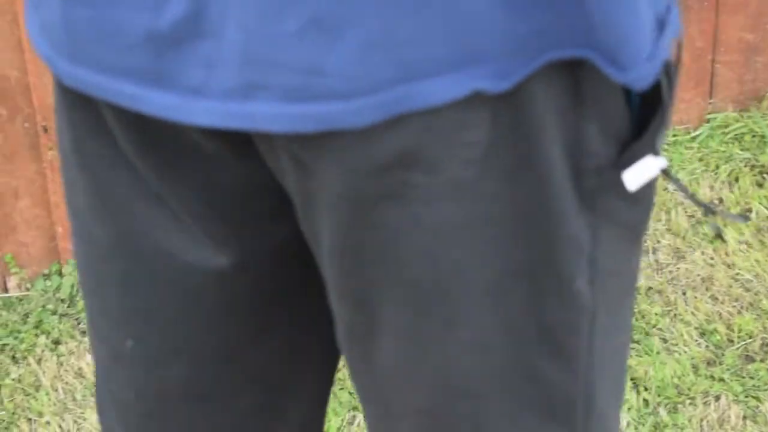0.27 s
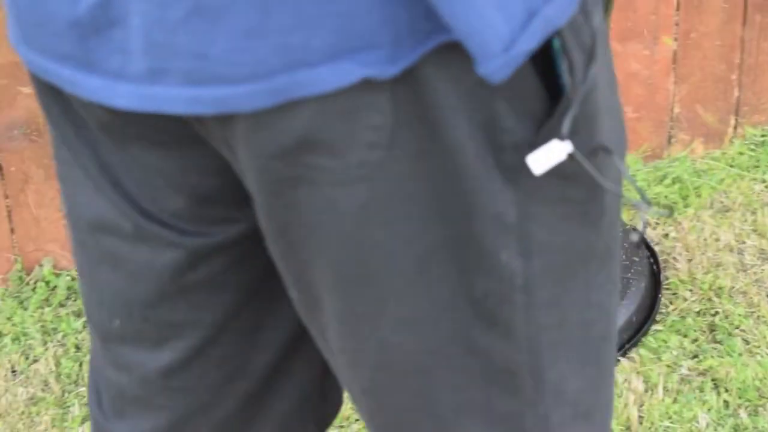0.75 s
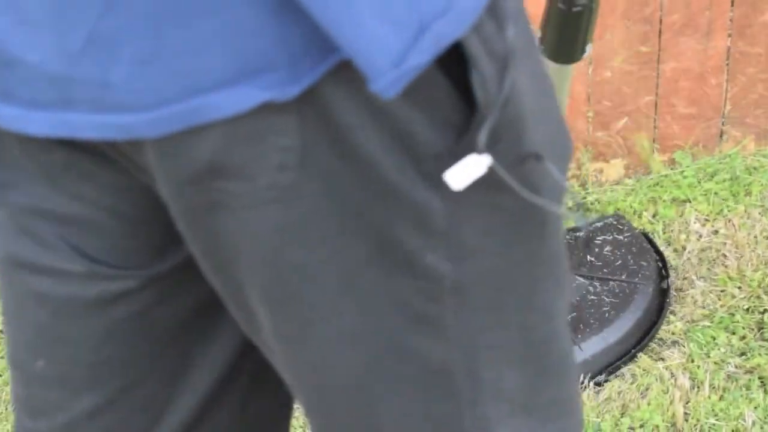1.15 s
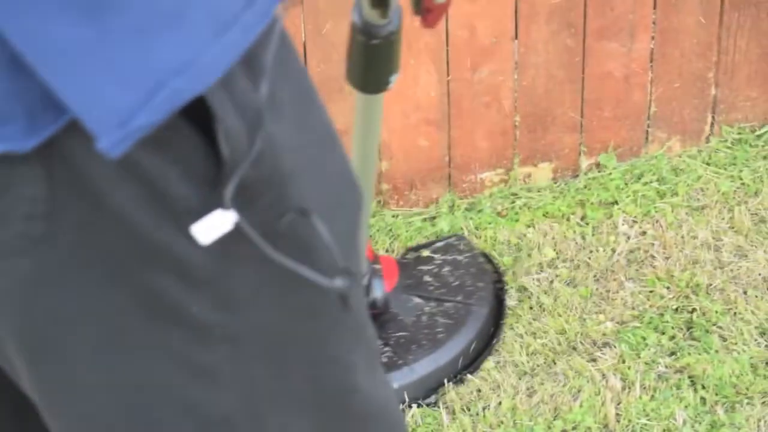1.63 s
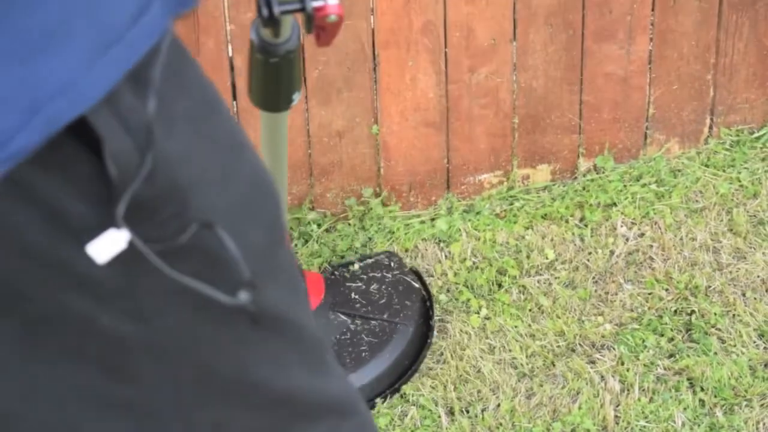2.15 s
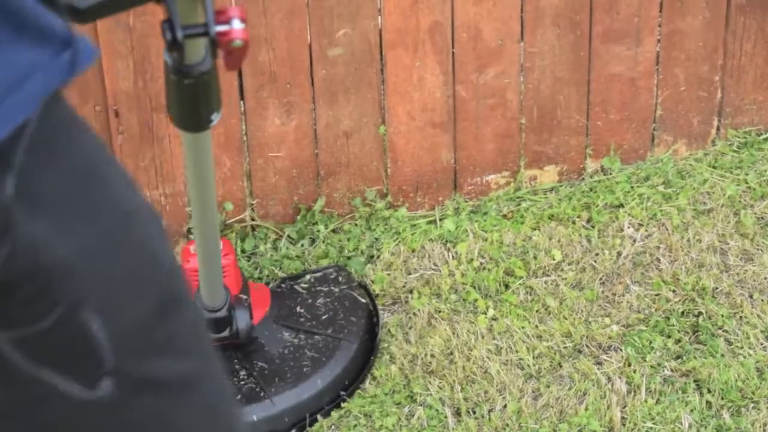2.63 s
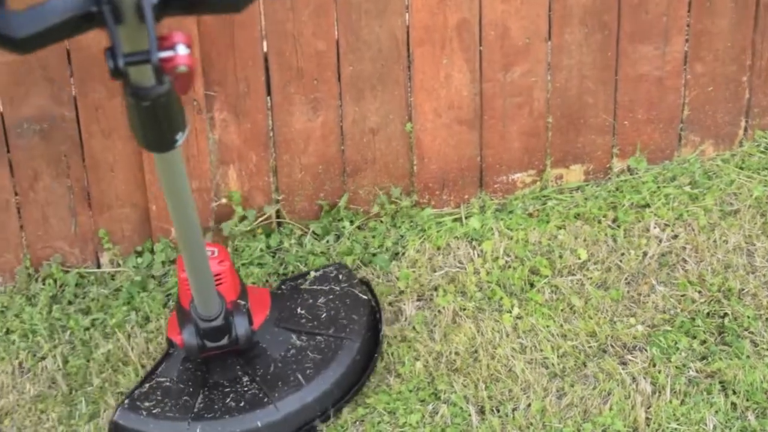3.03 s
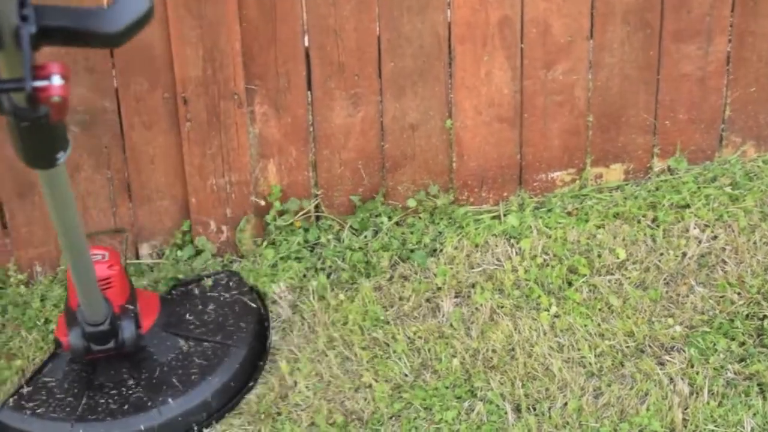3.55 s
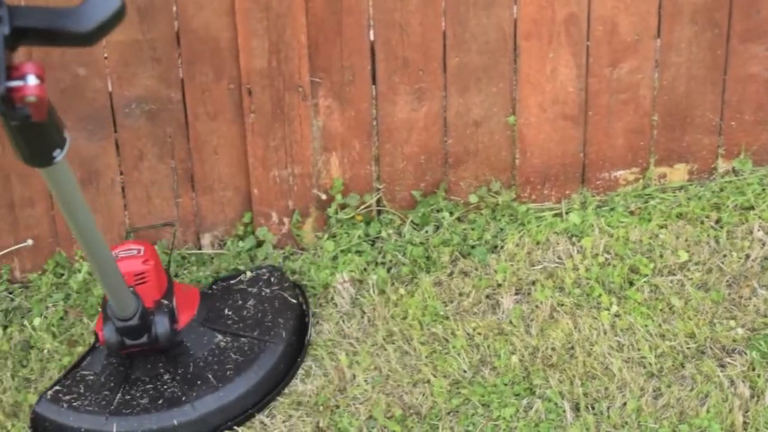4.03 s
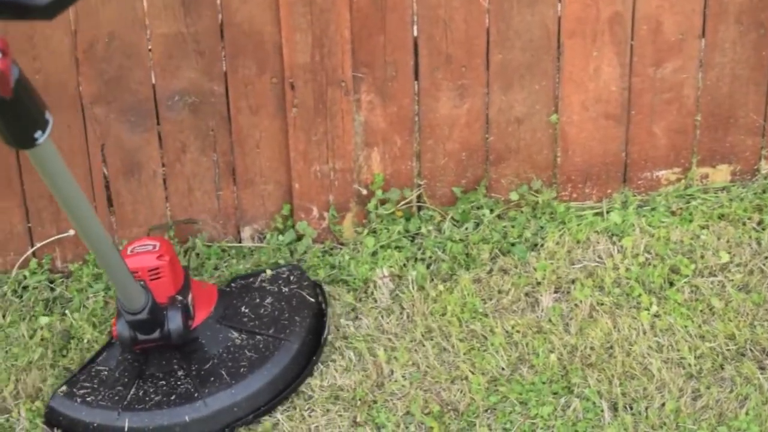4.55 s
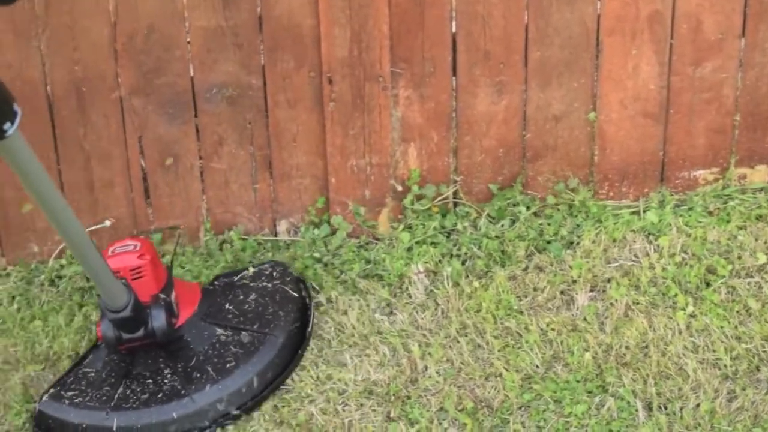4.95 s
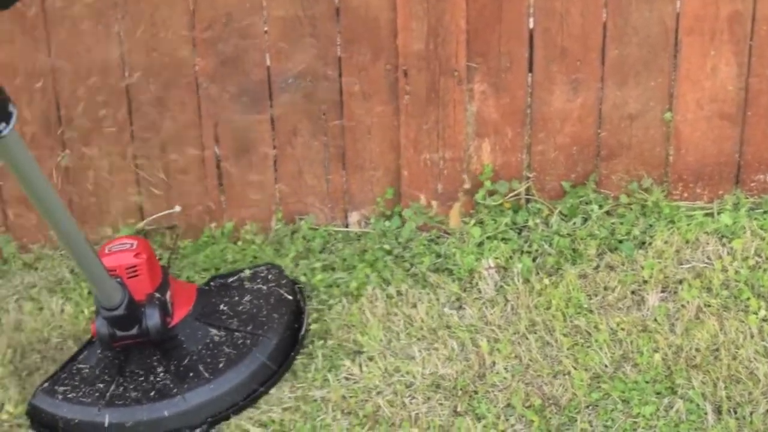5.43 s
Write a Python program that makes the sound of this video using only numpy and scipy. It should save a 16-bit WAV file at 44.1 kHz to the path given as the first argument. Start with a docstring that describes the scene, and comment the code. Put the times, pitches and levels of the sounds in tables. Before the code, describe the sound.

Close electric grass trimmer running at high speed, buzzing hum and airy hiss, with brief sags, rasps and snaps of cut stalks.

```python
"""Lawn edge along a wooden fence: a cordless string trimmer at work, a step or two away.
Its two nylon lines beat the air twice a turn (hum, a sum of partials) and shed whistling eddies
(hiss, coloured noise plus two whistles); air rushes round the guard in puffs.
Where the lines bite into grass the head slows, the hum roughens, and stalks thrash and snap."""
import sys
import numpy as np
from scipy import signal
from scipy.fft import rfft, irfft
from scipy.io import wavfile
from scipy.ndimage import map_coordinates

SR = 44100
rng = np.random.default_rng(int(sys.argv[2]) if len(sys.argv) > 2 else 0)


def to_wav(sig):
    """Store sig (one row per channel, or 1-D mono) as 16-bit WAV at the path in sys.argv[1].

    Samples outside -1..1 are clipped; the rate is SR.
    """
    pcm = np.clip(np.atleast_2d(sig), -1, 1) * 32767
    pcm = np.round(pcm).astype(np.int16)
    wavfile.write(sys.argv[1], SR, pcm.T)  # frames by channels


N = 250929
TIME_S = np.arange(N) / SR
BINS_HZ = np.fft.rfftfreq(N, 1 / SR)


def amp(db):
    """Decibels to gain."""
    return 10 ** (np.asarray(db) / 20)


def unit(x):
    """Scales to rms 1."""
    return x / np.sqrt(np.mean(x ** 2) + 1e-20)


def play(table):
    """Each column of a curve table at every sample."""
    s, *columns = np.transpose(table)
    return [np.interp(TIME_S, s, column) for column in columns]


def colour(x, points):
    """Filters by a spectrum drawn on a log-frequency axis."""
    hz, db = np.transpose(points)
    gain_db = np.interp(np.log(BINS_HZ + 1), np.log(hz), db)
    return irfft(rfft(x) * amp(gain_db), N)


def bandpass(x, order, low_hz, high_hz):
    """Butterworth band-pass."""
    return signal.sosfilt(signal.butter(order, [low_hz, high_hz], "band", fs=SR, output="sos"), x)


def wander(rate_hz):
    """Slow chance of rms 1, with new values rate_hz times a second."""
    return unit(np.interp(TIME_S * rate_hz, np.arange(8192), rng.standard_normal(8192)))


def sweeps(turns, depth_db, uneven_db, scatter_db, edge_db=0):
    """Swell as each line swings by, sharpened at the guard's edges; one line is longer, passes differ."""
    chance = np.interp(2 * turns, np.arange(2048), rng.standard_normal(2048))
    angle = 2 * np.pi * turns
    passes_db = depth_db * np.cos(2 * angle) - edge_db * np.cos(4 * angle)
    return unit(amp(passes_db + uneven_db * np.cos(angle) + scatter_db * chance))


def stretches(x, parts, sag, swing):
    """Splits a sound into overlapping ranges of pitch, each with its own response to swing and lost speed."""
    centres_hz = [part[0] for part in parts]
    spectrum = rfft(x)
    out = []
    for (_, db, swing_db, sag_db), pick in zip(parts, np.eye(len(parts))):
        band = irfft(spectrum * np.interp(BINS_HZ, centres_hz, pick), N)
        out.append(amp(db + swing_db * swing + sag_db * sag) * band)
    return out


GRIP_S, SETTLE_S = 0.01996, 0.018  # the lines enter and leave a tuft; the blades settle


def held(start_s, length_s):
    """Rises to 1, holds and lets go, each edge taking GRIP_S."""
    rise = np.clip((TIME_S - start_s) / GRIP_S, 0, 1)
    return rise * np.clip((start_s + length_s - TIME_S) / GRIP_S + 1, 0, 1)


def lagged(x, lag_s, first=0):
    """Follows x with inertia, starting from the value first."""
    keep = np.exp(-1 / (lag_s * SR))
    return signal.lfilter([1 - keep], [1, -keep], x + 1e-12, zi=[first])[0]


# Lines in the grass, from light grazing to thick tufts. Each row: start in seconds, length in seconds,
# drag in turns per second, thrashing in dB before the gain of the grass.
CUTS = [(0, 0.096, 9, -38.5), (0.101, 0.04, 7, -36), (0.282, .11, 7.7, -38.5), (0.417, 0.19, 1.8, -44.5),
        (0.643, 0.11, 3.47, -59), (0.775, 0.4, 1.92, -55), (1.181, 0.06, 11.5, -36),
        (1.249, 0.086, 24.4, -41), (1.376, 0.1406, 1.42, -45), (1.712, 0.22, 3.16, -47),
        (1.986, 0.093, 5.5, -45), (2.078, 0.36, 1.32, -50), (2.452, 0.13, 4.74, -41.5),
        (2.582, 0.19, 1, -60), (2.889, 0.08, 2.45, -46), (3.156, 0.23, 0.804, -66),
        (3.37, .131, 2.8, -49.5), (3.749, 0.057, 12.3, -37), (3.824, 0.09, 4.25, -40),
        (3.913, .15, 4.06, -47), (4.121, 0.53, 1.61, -72), (4.984, 0.12, 12.4, -39.5),
        (5.121, 0.42, 1.92, -53), (5.534, 0.082, 29.6, -34.5), (5.628, 0.051, 14.6, -52)]
SPIN_S, FIRST_SAG_TURNS_PER_S = .133, 8.4  # inertia of the head; speed already lost at the start


def load():
    """Grass drags on the lines; the head loses speed with inertia: drag, turns per second lost, thrash gain."""
    drag, thrash = np.zeros((2, N))
    for start_s, length_s, turns_per_s, db in CUTS:
        contact = held(start_s, length_s)
        drag += turns_per_s * contact
        thrash += amp(db) * contact
    sag = lagged(drag, SPIN_S, FIRST_SAG_TURNS_PER_S)
    return lagged(drag, SETTLE_S), sag, lagged(thrash, SETTLE_S)


# Partials of the hum. Each row: order of the turning speed, level in dB before the changes below.
PARTIALS = [(1, -64.5), (3, -50.5), (4, -26), (5, -45.5), (7, -46.5), (9, -51), (10, -38), (11, -61),
            (13, -63), (16, -45.5), (17, -63), (18, -53.5), (19, -57.5), (20, -48), (22, -48.5),
            (24, -53.5), (26, -57.5), (28, -61), (30, -63), (32, -61.5), (34, -63.5), (40, -63.5),
            (42, -60.5)]
# Response of those partials. Each row: order, dB at full left swing, dB per turn per second lost,
# share of the buzz.
RESPONSE = [(1, -6, -0.5, -0.08), (4.33, -1.8, -0.34, -0.17), (6.18, -5, 0, 0.32), (7.95, 0, -0.5, -0.22),
            (10, 2, -0.33, -0.83), (12.1, -1, -4, -0.39), (13.2, 3, -2.7, 0.86), (16, -1, -0.92, 1),
            (18, 6, 0.3, 0.49), (19.98, 0, -0.02, 0.55), (21.5, 4.5, -0.73, 0.044), (25.1, 7, -0.1, 0.15),
            (33.5, 4.5, 0.24, 0.065)]
# Low drone, order 2, and its harmonics, which swell and fade as the head moves over the ground.
# Each row: time in seconds, level in dB.
DRONE = [(0, -41.5), (.42, -47), (.64, -60), (.87, -52), (1.2, -47), (1.35, -39.5), (1.49, -53.5),
         (1.65, -40.5), (2.3, -39), (3.05, -39), (4.05, -44.5), (4.87, -54.5), (5.06, -44.5), (5.25, -49),
         (5.69, -43)]
THIRD_HARMONIC = [(0, -37.5), (.3, -37), (.52, -40), (.8, -36.5), (1.22, -37), (1.32, -37), (1.45, -37),
                  (2.3, -36.5), (2.4, -39), (2.55, -34.5), (2.8, -37), (3.3, -38.5), (3.85, -37.5),
                  (4.35, -44), (5.1, -34.5), (5.3, -38), (5.48, -32.5), (5.69, -42)]
FOURTH_HARMONIC = [(0, -41), (.55, -44), (.73, -50), (.9, -51), (1.3, -44), (1.45, -48), (2.05, -41.5),
                   (2.35, -40), (2.9, -43.5), (3.15, -46), (3.65, -56), (3.78, -38), (3.9, -40.5),
                   (4.15, -45.5), (4.5, -43.5), (5.69, -45)]
SIXTH_HARMONIC = [(0, -63), (.7, -43), (1.4, -49), (1.62, -57), (1.8, -44), (2.1, -46), (2.3, -51),
                  (2.55, -45), (2.8, -48), (3.1, -61), (3.5, -50), (4.1, -49), (4.5, -49), (5.0, -47.5),
                  (5.3, -40), (5.69, -46)]
SEVENTH_HARMONIC = [(0, -62), (.45, -71), (.65, -51), (1.05, -46), (1.17, -52), (1.75, -44.5), (2.1, -47),
                    (2.77, -58), (2.92, -39), (3.3, -43), (3.6, -39), (3.8, -45.5), (4.05, -50), (4.2, -42),
                    (4.95, -46), (5.1, -42), (5.69, -51)]
# Main note, order 4. Each row: time in seconds, change in dB.
NOTE_SWELL = [(0, -2), (.35, 0.8), (2.2, -0.7), (2.45, -2.3), (2.82, -1.8), (3.1, -0.5), (3.7, -0.3),
              (3.83, -1), (4.25, 1.5), (5.05, 0.5), (5.69, -1.5)]
# Buzz around 1.6 kHz. Each row: time in seconds, change in dB, before each partial's share.
BUZZ = [(0, -1.5), (.9, -1), (1.25, -1.5), (1.65, -1), (2.1, -2.5), (2.78, 0), (2.95, 7), (3.35, 5.5),
        (3.85, 4.5), (4.9, 1), (5.69, 1.5)]
# Whine above 2.2 kHz. Each row: time in seconds, change in dB.
WHINE = [(0, -1), (.3, -1), (.62, 0.5), (.9, -4), (1.3, 2), (1.55, 3.5), (1.9, -3), (2.2, -4), (2.5, -1),
         (2.75, -3.5), (3.1, -2.5), (3.6, -3), (4.2, 0.5), (4.9, -1.5), (5.1, -1), (5.45, 0.5), (5.69, -3)]
THROB_AT_S, THROB_S, THROB_DB = 2.01, 0.268, 11  # a brief swell of the once-a-turn throb
WAVER_DB = 1.5  # limit of the slow waver of the weak partials
FLUTTER_TURNS, FLUTTER_TURNS_PER_DRAG = .0005, .0004  # rms: running free; per turn per second of drag
CHIRP_TURNS = .0015  # lag of a partial per squared order
SMEAR_TURNS, SMEAR_LEFT_TURNS = .13, .05  # rms random lag, swung right and left


def hum(turns, sag, swing, drag, shimmer_db=2.56):
    """Pressure pulses of the lines passing the guard; grass makes the lines flutter."""
    buzz_db, = play(BUZZ)
    whine_db, = play(WHINE)
    orders, *response = np.transpose(RESPONSE)
    curves = {2: DRONE, 6: THIRD_HARMONIC, 8: FOURTH_HARMONIC, 12: SIXTH_HARMONIC, 14: SEVENTH_HARMONIC}
    levels_db = {k: play(curve)[0] for k, curve in curves.items()}
    for order, db in PARTIALS:
        k = round(order)
        swing_db, sag_db, share = [np.interp(k, orders, column) for column in response]
        levels_db[k] = db + swing_db * swing + sag_db * sag + share * buzz_db
        if k >= 22:
            levels_db[k] += whine_db
        if k not in (1, 4, 10, 16):
            # weak orders waver as the head moves over the ground
            levels_db[k] += WAVER_DB * np.tanh(wander(4)) + shimmer_db * wander(45)
    levels_db[1] += THROB_DB * held(THROB_AT_S, THROB_S)
    levels_db[4] += play(NOTE_SWELL)[0]

    flutter = (FLUTTER_TURNS + FLUTTER_TURNS_PER_DRAG * drag) * wander(170)
    even_smear = SMEAR_TURNS + (SMEAR_LEFT_TURNS - SMEAR_TURNS) * swing
    out = np.zeros(N)
    for k, db in levels_db.items():
        # even orders line up in two rising chirps a turn, tighter at the left; odd and top ones scatter
        smear = 1 if k % 2 or k > 29 else even_smear
        lag = CHIRP_TURNS * k ** 2 + smear * rng.standard_normal()
        out += amp(db) * np.cos(2 * np.pi * (k * (turns + flutter) - lag))
    return np.sqrt(2) * out


# Whistles of the two lines, wandering as the lines flex and the head tilts.
# Each row: time in seconds, pitch in Hz, relative level in dB.
LOW_WHISTLE = [(0, 7850, -8), (0.249, 7380, 0.5), (0.701, 7440, -3), (1.0, 7370, -3.5), (1.35, 7526, -14),
               (1.7, 7468, -3), (2.0, 7340, -1.5), (2.3, 7597, -1.5), (2.65, 7620, -15), (2.952, 8042, 1),
               (3.3, 7930, -2), (3.6, 8198, 3.5), (4.201, 8210, 4), (4.398, 7824, 2.5), (4.85, 7830, -5.5),
               (5.099, 7266, -1.5), (5.349, 7563, 2), (5.69, 7380, 2)]
HIGH_WHISTLE = [(0, 8860, -9), (0.219, 9030, 2), (0.451, 8420, -9), (0.95, 8940, 0), (1.3, 8850, -28),
                (1.65, 8600, -9.5), (2.102, 8570, -21), (2.721, 9320, -2), (2.921, 8840, -8),
                (3.099, 8580, 0.5), (3.351, 8720, 0.5), (3.698, 9170, 0.5), (4.3, 9400, -4),
                (4.55, 8890, 4), (4.881, 8300, 3.5), (5.101, 8255, -9), (5.319, 8380, 7), (5.69, 8480, -27)]


def whistle(turns, table, width_hz=520, doppler_hz=130):
    """The narrow, fuzzy tone of one line's eddies; it swings in pitch with each pass."""
    pitch_hz, db = play(table)
    swung_hz = pitch_hz + doppler_hz * np.sin(4 * np.pi * turns)
    carrier = np.exp(2j * np.pi * np.cumsum(swung_hz) / SR)
    lowpass = signal.butter(2, width_hz / 2, fs=SR, output="sos")
    eddies = signal.sosfilt(lowpass, rng.standard_normal((2, N)))
    return amp(db) * unit((carrier * (eddies[0] + 1j * eddies[1])).real)


# Spectrum of the swish. Each row: frequency in Hz, gain in dB.
HISS_COLOUR = [(2500, -47), (3600, -33.5), (4400, -25), (5200, -14), (6000, -7), (6700, -4), (7400, 1.5),
               (8200, 1.5), (9200, -0.5), (10300, -2.5), (11500, -8), (12400, -16), (13300, -29.5),
               (16000, -88)]
# Root, inner half, outer half and tip of the line. Each row: centre in Hz, gain in dB,
# dB at full left swing, dB per turn per second lost.
LINE = [(3880, 2.5, -8, -0.15), (5230, 3, -5, 0.2), (7700, 2, -3, -0.27), (9300, 2.5, -1, -0.3456)]
# Hiss around 4.5, 5.5 and 8 kHz, and its treble. Each row: time in seconds, change in dB.
LOW_HISS_SWELL = [(0, -10), (.55, 5), (1.5, 13), (2.0, -7), (2.45, -12), (2.78, 7.5), (3.0, -7), (3.6, -4),
                  (4.5, 9), (5.08, 3.5), (5.3, -9), (5.69, -6)]
MID_HISS_SWELL = [(0, -2.7), (.3, -0.26), (1.6, 0.23), (2.0, 0.91), (2.9, 1.35), (3.7, -0.63), (4.3, -0.57),
                  (4.8, -0.85), (5.05, 1.5), (5.3, -2.07), (5.69, -0.06)]
HISS_SWELL = [(0, -1.6), (1.3, 0.3), (1.7, 0), (2.27, 2), (2.87, -0.5), (3.0, 2), (3.55, 0), (3.72, -7.5),
              (3.95, 0), (5.03, -0.3), (5.28, -0.5), (5.69, 3)]
TREBLE_SWELL = [(0, -4.5), (.6, -5), (.96, 0.5), (1.5, 1.5), (2.04, -2), (2.39, -0.5), (2.55, 2.5),
                (3.23, -1), (3.95, -2.5), (4.19, -4), (4.43, -1), (4.7, -2.5), (5.69, 2)]
DRIFT_DB = .5  # rms chance drift of each stretch


def hiss(turns, sag, swing, whistle_db=-6, pulse_db=3.0, pulse_swing_db=-1.5):
    """Eddies peel off the lines, higher towards the tip: a swish pulsing with each pass, and two whistles."""
    noise = rng.standard_normal(N)
    beat = sweeps(turns, pulse_db + pulse_swing_db * swing, 0.79, 1.06, 1.0)
    swish = unit(colour(noise * beat, HISS_COLOUR))
    whistles = whistle(turns, LOW_WHISTLE) + whistle(turns, HIGH_WHISTLE)
    # the middle of the line trails behind, so its whistle swells a little later
    late_beat = sweeps(turns - .06, 2.0, .5, 1.0)
    eddies = unit(swish + amp(whistle_db) * whistles * late_beat)
    shaped = np.zeros(N)
    swells = [LOW_HISS_SWELL, MID_HISS_SWELL, HISS_SWELL, TREBLE_SWELL]
    for stretch, swell in zip(stretches(eddies, LINE, sag, swing), swells):
        shaped += amp(play(swell)[0] + DRIFT_DB * wander(11)) * stretch
    return amp(-19.5 + 0.46 * wander(40)) * shaped


# Spectrum of the rush. Each row: frequency in Hz, gain in dB.
AIR_COLOUR = [(30, -44), (80, -24), (130, -12), (220, -6), (320, 0), (480, 8.5), (750, 4.5), (1100, 6.5),
              (1600, 1), (2300, 2), (2900, -6.5), (3700, -6.5), (5000, -3), (12000, -22)]
# Low and high part of the rush. Each row: centre in Hz, gain in dB, dB at full left swing,
# dB per turn per second lost.
AIR_PARTS = [(895, 0, -3.5, 0.25), (1970, -1, 0, -0.13)]
# Rush around 2 kHz. Each row: time in seconds, change in dB.
RUSH_SWELL = [(0, 8.5), (.3, 4.5), (.7, 2.5), (.95, -0.5), (1.25, 6), (1.45, -3), (1.85, 5.5), (2.2, 4),
              (2.5, 5), (2.75, 0.5), (3.0, 4), (3.25, 2), (3.9, 7), (4.9, 1.5), (5.69, 6.5)]


def rush(turns, sag, swing):
    """Turbulent air pushed round the guard in puffs at the rate of the passes, sharper at the left."""
    beat = sweeps(turns - .055, 1.0 + 2.0 * swing, 0.3, 0.5)
    puffs = unit(colour(rng.standard_normal(N) * beat, AIR_COLOUR))
    low, high = stretches(puffs, AIR_PARTS, sag, swing)
    return amp(-39.5) * (low + amp(play(RUSH_SWELL)[0]) * high)


# Reflections off the guard and the ground. Each row: lag in ms, change of lag at full left swing in ms,
# level in dB.
REFLECTIONS = [(.422, -0.067, -27), (1.222, -0.23, -29)]


def echoes(x, swing):
    """Two close reflections comb the hiss and rush; the comb slides as the head is swung."""
    at = np.arange(N)
    out = x.copy()
    for lag_ms, change_ms, db in REFLECTIONS:
        lag_samples = (lag_ms + change_ms * swing) * SR / 1000
        out += amp(db) * map_coordinates(x, [at - lag_samples], order=3)
    return out


# Two hollows in the hiss and rush, where sound off the ground and the fence cancels it.
# Each row: time in seconds, centre in Hz, depth 0-1.
LOW_HOLLOW = [(0, 3900, .2), (1.2, 3650, 0.7), (1.45, 3532, 0), (1.9, 3830, 0.39), (2.7, 3683, 0.2),
              (3.2, 3960, 0.19), (3.65, 4183, 0.1), (3.85, 4240, 0.28), (4.2, 4202, 0.2),
              (4.45, 4091, 0.62), (4.85, 4004, 0.48), (5.1, 3736, 0.15), (5.69, 3800, 0.41)]
HIGH_HOLLOW = [(0, 4600, 0.12), (2.8, 4540, 0.09), (3.05, 4830, 0.71), (3.35, 4872, 0.35),
               (3.62, 5046, 0.63), (3.85, 5074, 0.28), (4.3, 5090, 0.46), (4.8, 4717, 0.32),
               (5.05, 4640, 0.0038)]
HOLLOW_WIDTH_HZ = 480


def hollow(x, table):
    """Takes a gliding band out: shifts it to 0 Hz, smooths, shifts back and subtracts."""
    centre_hz, depth = play(table)
    carrier = np.exp(2j * np.pi * np.cumsum(centre_hz) / SR)
    keep = np.exp(-np.pi * HOLLOW_WIDTH_HZ / SR)
    band = 2 * (carrier * signal.lfilter([1 - keep], [1, -keep], x / carrier)).real
    return x - np.clip(depth, 0, 1) * band


# Spectrum of the thrashing. Each row: frequency in Hz, gain in dB.
GRASS_COLOUR = [(30, -44), (90, -40), (170, -4.5), (300, -4.5), (480, 3.5), (800, -2.5), (1250, -1),
                (1700, -24), (2400, -5.5), (3500, -22), (6000, -2), (10000, -16), (16000, -14)]


def grass(turns, thrash, stalks_per_s=7000):
    """Each pass of a line whips a handful of blades: sparse random clicks, coloured."""
    blades = rng.standard_normal(N) * (rng.random(N) < stalks_per_s / SR)
    whipped = blades * sweeps(turns, 1.4, 0.19, 0.29)
    return amp(5.0) * thrash * unit(colour(whipped, GRASS_COLOUR))


# Lines skimming loose blades. Each row: start in seconds, length in seconds, pitch in Hz,
# level in dB before the swell and fade.
BRUSHES = [(.09, .09, 850, -36), (1.174, .15, 4606, -38), (1.159, 0.26, 952, -36), (1.665, 0.16, 5546, -38),
           (1.77, 0.077, 1254, -40), (1.919, 0.14, 2000, -42), (2.385, 0.19, 1950, -40),
           (3.787, 0.16, 862, -40.5), (4.95, .18, 4400, -40), (5.483, .13, 2800, -41.5),
           (5.541, .13, 1051, -33)]
BRUSH_WIDTH = 0.27  # half-width of a brush, as a share of its pitch


def brushes(turns):
    """Line tips skim loose blades: short rasps that swell and fade, low in soft leaves, high in dry stalks."""
    out = np.zeros(N)
    for start_s, length_s, hz, db in BRUSHES:
        noise = rng.standard_normal(N) * sweeps(turns, 1.5, .5, .8)
        rasp = unit(bandpass(noise, 2, hz * (1 - BRUSH_WIDTH), hz * (1 + BRUSH_WIDTH)))
        arch = np.sin(np.pi * np.clip((TIME_S - start_s) / length_s, 0, 1)) ** 2
        out += amp(db) * arch * rasp
    return out


# Stalks and grit flung against the guard. Each row: time in seconds, then peak levels of the knock,
# crunch and snap in dB before the final high-pass.
STRIKES = [(0.124, -24, -26, -28), (.133, -22, -26, -29), (0.152, -20.5, -32, -32), (0.363, -22, -28, -43),
           (0.5, -41, -36, -17), (1.212, -37, -28, -18), (1.268, -36, -33, -17), (1.282, -24, -24, -25),
           (1.291, -32, -26, -28), (1.326, -26, -32, -22), (1.343, -23, -23, -15), (1.361, -15.5, -22, -22),
           (3.767, -26, -22, -7), (3.777, -24, -23, -28), (3.787, -23, -21, -11), (3.796, -22, -29, -27),
           (5.575, -21, -29, -27), (5.583, -31, -25, -29), (5.593, -31, -28, -30), (5.605, -18, -23, -28),
           (5.616, -17.5, -30, -27), (5.633, -31, -29, -33), (5.648, -17, -20, -22), (5.683, -19, -26, -25)]
# Modes of the plastic guard. Each row: mean pitch in Hz, relative level in dB, t60 in seconds.
GUARD = [(306, -8.5, 0.027), (428, 13.5, 0.018), (1110, -2.5, 0.0075), (2030, 11, 0.0086)]


def strikes(knock_rise_s=0.00068, snap_s=0.0014, crunch_s=0.0014, crunch_hz=1350):
    """A dull guard knock cushioned by grass, the soft crunch of the tearing stalk and a bright snap."""
    age_s = np.arange(2048) / SR
    out = np.zeros(N)
    for s, knock_db, crunch_db, snap_db in STRIKES:
        ring = np.zeros(len(age_s))
        for hz, db, t60_s in GUARD:
            struck_hz = hz * (1 + 0.083 * rng.standard_normal())
            decay = np.exp(-np.log(1000) * age_s / t60_s)
            ring += amp(db) * decay * np.sin(2 * np.pi * struck_hz * age_s)
        knock = ring * (1 - np.exp(-age_s / knock_rise_s))
        snap = bandpass(rng.standard_normal(len(age_s)) * np.exp(-age_s / snap_s), 3, 7000, 12500)
        tear = rng.standard_normal(len(age_s)) * age_s * np.exp(-age_s / crunch_s)
        crunch = bandpass(tear, 3, 600, crunch_hz)
        layers = [(knock, knock_db), (snap, snap_db), (crunch, crunch_db)]
        sound = sum(amp(db) * x / abs(x).max() for x, db in layers)
        part = out[round(s * SR):][:len(age_s)]
        part += sound[:len(part)]
    return signal.sosfilt(signal.butter(4, 150, "high", fs=SR, output="sos"), out)


# Swing of the head along the fence. Each row: time in seconds, position (0 = right, 1 = left).
SWING = [(0, 0.099), (1.0, 0.083), (1.5, 0.041), (2.75, 0.038), (3.0, 0.55), (3.7, 0.9), (4.2, 0.96),
         (4.92, 0.55), (5.06, 0.16), (5.69, 0.3)]
FREE_TURNS_PER_S = 105.9  # unloaded speed
# thick grass damps the hiss: dB per turn per second of drag; drag at which this begins
MUFFLE_DB, BURIED_DRAG_TURNS_PER_S = -0.3, 9


def scene():
    """Grass load and head swing drive the layers; both channels carry the same sound."""
    drag, sag, thrash = load()
    swing, = play(SWING)
    turns = np.cumsum(FREE_TURNS_PER_S - sag) / SR
    buried = lagged(np.maximum(drag - BURIED_DRAG_TURNS_PER_S, 0), SETTLE_S)
    air = amp(MUFFLE_DB * buried) * hiss(turns, sag, swing) + rush(turns, sag, swing)
    air = hollow(hollow(echoes(air, swing), LOW_HOLLOW), HIGH_HOLLOW)
    trimmer = hum(turns, sag, swing, drag) + air
    trimmer = trimmer + grass(turns, thrash) + brushes(turns) + strikes()
    return np.array([trimmer, trimmer])


EDGE_HZ = 16000


def record(dry):
    """The recorder's band limit: a linear-phase low-pass."""
    lowpass = signal.firwin(511, EDGE_HZ, window=("kaiser", 9), fs=SR)
    return signal.oaconvolve(dry, lowpass[None], "same")


dry = scene()
out = record(dry)
to_wav(out)
```